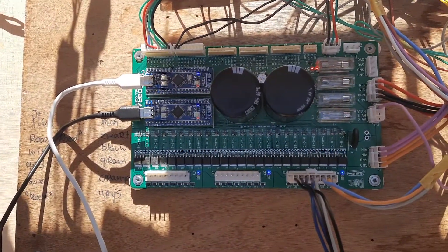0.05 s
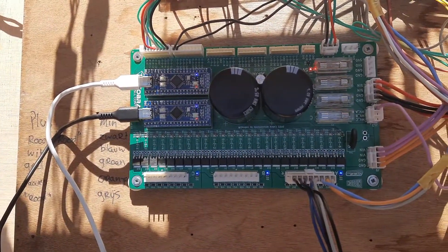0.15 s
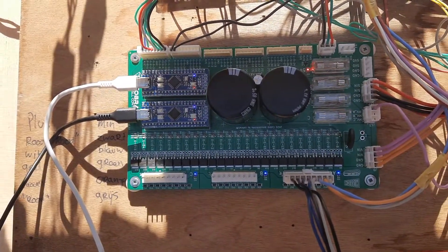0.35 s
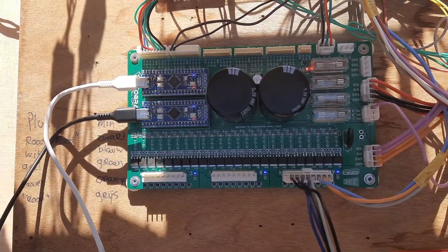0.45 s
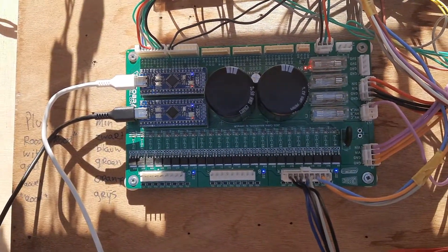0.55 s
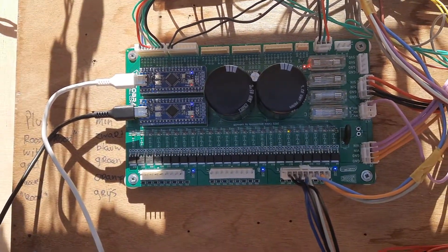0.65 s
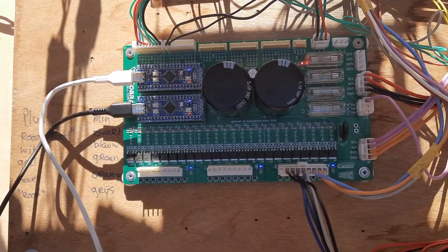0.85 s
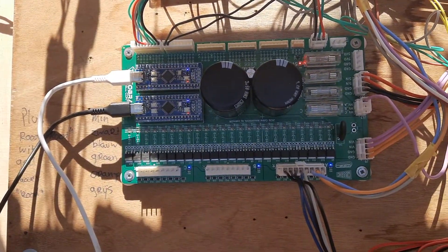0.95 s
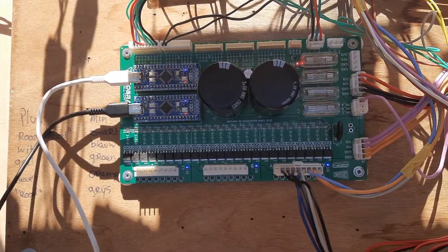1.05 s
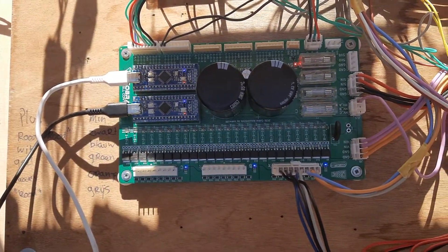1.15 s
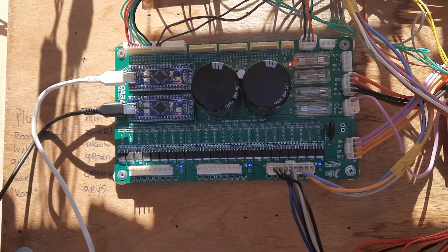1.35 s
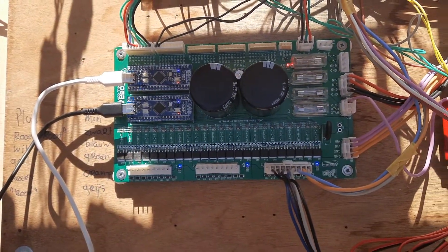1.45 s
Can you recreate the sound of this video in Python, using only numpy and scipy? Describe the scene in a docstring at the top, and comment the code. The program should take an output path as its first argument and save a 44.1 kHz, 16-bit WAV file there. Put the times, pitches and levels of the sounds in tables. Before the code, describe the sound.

One loud solenoid clack shakes a wooden board and leaves a short metallic ring in a small room. Faint ticks lead into a softer release knock, while a quiet hum and airy rush sit slightly right of the microphone.

```python
"""A low hum and a rush of air, as from fans, fill a small live room, a little right of the microphone.
A solenoid on a wooden panel fires: the plunger kicks, then slams into its stop and thumps the board.
Panel and metalwork ring on with the room, and the hum and air sit lower after the clack.
Two faint ticks follow, and the plunger drops back with a dull knock."""
import sys
import numpy as np
from scipy import signal
from scipy.io import wavfile

SR = 44100
rng = np.random.default_rng(int(sys.argv[2]) if len(sys.argv) > 2 else 0)


def wrap_up_sound(samples):
    """Save the sound to the file named by the first command line argument, as 16-bit audio."""
    columns = np.atleast_2d(samples).T
    # keep every value between -1 and 1, then stretch to whole-number steps
    tamed = np.clip(columns, -1, 1)
    steps = np.round(tamed * 32767).astype(np.int16)
    wavfile.write(sys.argv[1], SR, steps)


N = 66150
TIME = np.arange(N) / SR
LEFT_LAG_S, PANEL_PAN_DB = .00041, -.5   # sound reaches the left of the microphone later

# The blows that set panel and room ringing, in seconds: the slam, then the release.
BLOW_TIMES = [0.2195, 0.881]
# How long the room rings. Each row: frequency in Hz, seconds to fall 60 dB.
ROOM_DECAY = [(100, .7), (600, 0.57), (2000, 0.55), (5000, 0.46), (8000, 0.37), (14000, 0.23)]


def from_db(db):
    """Decibels to gain."""
    return np.exp(np.asarray(db) * np.log(10) / 20)


def pan(db):
    """Left and right gains for a level difference; negative is to the right."""
    return from_db(np.array([[db], [-db]]) / 2)


def at_hz(points, hz):
    """Read a table on a log-frequency axis."""
    f, value = np.transpose(points)
    return np.interp(np.log(hz), np.log(f), value)


def rms_one(x):
    """Scale to rms 1."""
    return x / np.sqrt(np.mean(x ** 2) + 1e-20)


def since(s):
    """Time since a moment, zero before it."""
    return np.maximum(TIME - s, 0)


def ring(s, hz, t60, phase=0):
    """A mode struck at s seconds, falling 60 dB in t60 seconds."""
    t = since(s)
    return (t > 0) * np.sin(2 * np.pi * hz * t + phase) * from_db(-60 * t / t60)


def delayed(x, s):
    """Shift steady noise later in time."""
    return np.roll(x, int(round(s * SR)), axis=-1)


def reflected(x, delays_s=(.0027, .0047, .0073), gain=.12):
    """Reflections off nearby surfaces leave fine peaks and gaps in the spectrum."""
    return x + sum(gain * (-1) ** k * delayed(x, s) for k, s in enumerate(delays_s))


def noise_bands():
    """Bands of stereo noise, finer in the treble, with unit power per octave, as (Hz, noise)."""
    # How alike the microphone's two sides are. Each row: frequency in Hz, correlation.
    likeness = [(60, .85), (250, 0.93), (600, 0.19), (1500, 0.35), (12000, 0.15)]
    edges = np.concatenate([np.geomspace(28, 3000, 19)[:-1], np.geomspace(3000, 17000, 14)])
    white = reflected(rng.standard_normal((2, 2, N + SR // 4)))
    for k, (low, high) in enumerate(zip(edges, edges[1:])):
        band = signal.butter(2, [low, high], "band", fs=SR, output="sos")
        mid, side = signal.sosfilt(band, white[k % 2])[:, -N - 100:]
        hz = np.sqrt(low * high)
        alike = at_hz(likeness, hz)
        left, right = np.sqrt(1 + alike) * mid + np.sqrt(1 - alike) * side * [[1], [-1]]
        stereo = np.array([delayed(left, LEFT_LAG_S), right])[:, -N:]
        yield hz, rms_one(stereo) * np.sqrt(np.log2(high / low))


def air():
    """A soft rush, as from fans, right of centre and loudest before the clack."""
    # The colour of the rush. Each row: frequency in Hz, base level per octave in dB.
    spectrum = [(30, -104), (70, -86.5), (150, -79.5), (300, -69.5), (500, -65.5), (750, -54.5),
                (1200, -64), (2200, -68.5), (3400, -72.5), (4500, -78.5), (8000, -83.5), (10500, -83.5),
                (15000, -92.5)]
    # Its rise and fall. Each row: time in seconds, dB added to the base level.
    contour = [(0, 13), (.2, 12), (.4, -8), (.55, 0.5), (.75, 0.5), (1.1, -0.5), (1.42, -0.5), (1.5, 2)]
    rush = sum(from_db(at_hz(spectrum, hz)) * noise for hz, noise in noise_bands())
    return rush * pan(-3.5) * from_db(np.interp(TIME, *np.transpose(contour)))


def hum(waver_hz=5.3):
    """Wavering tones, right of centre, sink after the clack; one comes well up after the release."""
    # The hum's tones. Each row: frequency in Hz, level in dB before the clack, between the strokes
    # and after the release, depth of waver as a share.
    tones = [(73.6, -57.5, -78.5, -78.5, 0.18), (283.3, -55, -78, -76.5, 0.39), (491, -65, -67.5, -74, .4),
             (558, -52.5, -82, -79, .18), (597, -68.5, -82.5, -61.5, .15), (628, -62.5, -75, -71.5, 0.25),
             (727, -52, -70, -72, .3)]
    # Start and end of the first change of level, then of the second, in seconds.
    fade_times = [.3, .56, 1.0, 1.15]
    out = np.zeros((2, N))
    slow = signal.butter(2, waver_hz, fs=SR, output="sos")
    for hz, before_db, between_db, after_db, waver in tones:
        drift = rms_one(signal.sosfilt(slow, rng.standard_normal((2, 2, N + SR // 2)))[..., -N:])
        steady = np.exp(2j * np.pi * (hz * TIME + rng.random()))
        tone = np.real((1 + waver * (drift[0] + 1j * drift[1])) * steady)
        level_db = np.interp(TIME, fade_times, [before_db, between_db, between_db, after_db])
        out += rms_one(tone) * from_db(level_db)
    return out * pan(-3.5)


def contacts(room_delay_s=.014, room_build_s=.002):
    """Each contact shakes the mount's dense, damped modes, treble first; the room adds a diffuse tail."""
    # The mechanism's contacts. Each row: start in seconds, swell time at 1 kHz in seconds,
    # left minus right in dB, room send in dB, then a level in dB at each of level_hz.
    hits = [ (0.152, 0.0042, -8, 8.5, -70.5, -60, -62.5, -65, -66, -54, -59, -89),
            (0.1938, 0.0029, -15, -5, -62, -63, -49.5, -44.5, -47, -53, -45.5, -45),
            (0.2036, 0.0031, -10.5, -2, -47.5, -34, -20, -16, -27.5, -26.5, -21, -29.5),
            (0.2184, 0.0027, -0.5, 0, -42, -32, -22.5, -26.5, -18, -13, -17, -18),
            (0.7805, 0.0031, -4.5, -3.5, -97.5, -83.5, -67, -57, -62, -68.5, -49.5, -49.5),
            (0.8126, 0.0045, -6.5, -3, -80, -55, -43, -58, -64, -48.5, -57, -54),
            (0.8785, 0.0047, -6, -4, -52.5, -40.5, -34.5, -44, -50, -47.5, -51.5, -43.5)]
    # The frequencies of those levels, in Hz.
    level_hz = [140, 300, 700, 1500, 2400, 4400, 8000, 14000]
    # The room's colour. Each row: frequency in Hz, dB added to the room send.
    room_colour = [(60, -9), (140, -5), (300, -3), (600, -0.5), (1000, -5), (1500, -1), (2300, -7),
                   (3300, -2), (4500, -16.5), (5700, -4.5), (7000, -12.5), (8300, -7.5), (12300, -5.5),
                   (15000, -16.5)]
    swell_slope = .25   # low bending waves build up and die later
    shape = .94   # higher stops a contact more abruptly
    out = np.zeros((2, N))
    for hz, noise in noise_bands():
        power = np.zeros((2, N))
        bass_rolloff = min(1, hz / level_hz[0])
        for s, swell_s, pan_db, send_db, *levels in hits:
            gain = from_db(np.interp(np.log(hz), np.log(level_hz), levels)) * bass_rolloff
            band_swell_s = swell_s * (hz / 1000) ** -swell_slope
            age = np.minimum(since(s) / band_swell_s, 20)
            direct = age * np.exp((1 - age ** shape) / shape)
            late = since(s + room_delay_s)
            tail_db = send_db + at_hz(room_colour, hz) - 60 * late / at_hz(ROOM_DECAY, hz)
            tail = (1 - np.exp(-late / room_build_s)) * from_db(tail_db)
            power += (gain * direct * pan(pan_db)) ** 2 + (gain * tail * pan(-1)) ** 2
        out += noise * np.sqrt(power)
    return out


def frame_knock(peak_s=.2098, width_s=.0025):
    """The plunger's kick knocks the frame: a few tones swell and die while it travels."""
    # The frame's tones. Each row: frequency in Hz, peak level in dB.
    modes = [(760, -15.5), (1160, -19), (1630, -14), (2000, -21.5)]
    t = TIME - peak_s - np.array([[LEFT_LAG_S], [0]])
    tones = sum(from_db(db) * np.sin(2 * np.pi * (hz * t + rng.random())) for hz, db in modes)
    return tones * np.exp(-.5 * (t / width_s) ** 2) * pan(.5)


def room_boom_and_panel(build_s=.0056):
    """A low room boom near 105 Hz and the panel's modes build up and ring after each blow."""
    # One room mode, then the modes of the panel and its fittings. Each row: frequency in Hz,
    # seconds to fall 60 dB, level in dB at the slam and at the release.
    modes = [(105, .8, -41, -51), (232.2, 0.51, -45.5, -50.5), (357, .4, -38.5, -66),
             (435, 0.32, -33.5, -38.5), (482.2, .55, -30.5, -58.5), (597, 0.55, -36.5, -59),
             (687, 0.46, -34.5, -51), (761, 0.32, -36, -54), (844, .4, -36, -40),
             (1017, 0.63, -44.5, -55.5), (1380, 0.54, -36, -69), (1534, 0.598, -29, -60),
             (1973, .5, -30.5, -71.5), (2052, 0.61, -33, -59), (2796, .45, -36, -86),
             (3135, 0.37, -34.5, -71), (5715, .3, -27.5, -76.5)]
    out = np.zeros((2, N))
    for hz, t60, *levels in modes:
        phase = -2 * np.pi * hz * np.array([[LEFT_LAG_S], [0]])
        for s, db in zip(BLOW_TIMES, levels):
            build = 1 - np.exp(-since(s) / build_s)
            out += from_db(db) * build * ring(s, hz, t60, phase)
    return out * pan(PANEL_PAN_DB)


def metalwork(count=60, low_hz=1120.6, high_hz=9014, tilt_db_per_octave=-1.5):
    """The slam rings many thin modes of frame and spring, which die away with the room."""
    out = np.zeros((2, N))
    for place, left, right in rng.random(size=(count, 3)):
        hz = low_hz * (high_hz / low_hz) ** place
        gain = from_db(-42 + tilt_db_per_octave * np.log2(hz / low_hz))
        phase = 2 * np.pi * np.array([[left], [right]])
        out += gain * ring(BLOW_TIMES[0], hz, at_hz(ROOM_DECAY, hz), phase)
    return out


def thump():
    """The board heaves once under the slam, with a short low boom off to the right."""
    # The heave at the microphone, left then right. Each row: peak time in seconds,
    # frequency in Hz, width in cycles, level in dB.
    pulses = [(0.2247, 320, 0.29, -11), (0.2223, 276, .38, -10)]
    heave = np.zeros((2, N))
    for side, (s, hz, width, db) in enumerate(pulses):
        cycles = (TIME - s) * hz
        heave[side] = from_db(db) * np.cos(2 * np.pi * cycles) * np.exp(-.5 * (cycles / width) ** 2)
    boom = from_db(-25) * ring(s=.2215, hz=62, t60=.062)
    return heave + boom * pan(-12.5)


def tick_ring():
    """The panel answers the second tick with one short woody tone."""
    return from_db(-47) * ring(s=.818, hz=729, t60=.35) * pan(PANEL_PAN_DB)


def scene():
    """The solenoid and its panel over the room's air and hum, as they reach the microphone."""
    background = air() + hum()
    return background + contacts() + frame_knock() + room_boom_and_panel() + metalwork() + thump() + tick_ring()


def record(dry, low_cut_hz=33, top_hz=16000, ceiling=1.5):
    """The microphone loses deep bass and colours the treble; loud peaks are rounded and the top is cut."""
    # The microphone's treble peak and dip. Each row: frequency in Hz, gain in dB, Q.
    mic_colour = [(8350, 5.5, 6.1), (9870, -12, 3)]
    sound = signal.sosfilt(signal.butter(2, low_cut_hz, "high", fs=SR, output="sos"), dry)
    for hz, db, q in mic_colour:
        band = signal.lfilter(*signal.iirpeak(hz, q, fs=SR), sound)
        sound = sound + (from_db(db) - 1) * band
    rounded = ceiling * np.tanh(sound / ceiling)
    return signal.sosfilt(signal.ellip(10, .3, 70, top_hz, fs=SR, output="sos"), rounded)


dry = scene()
out = record(dry)
wrap_up_sound(out)
```